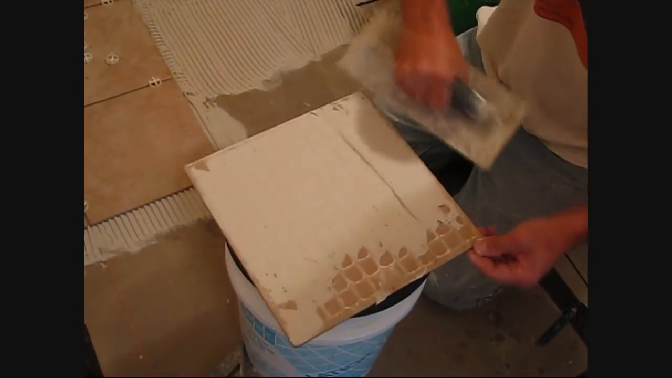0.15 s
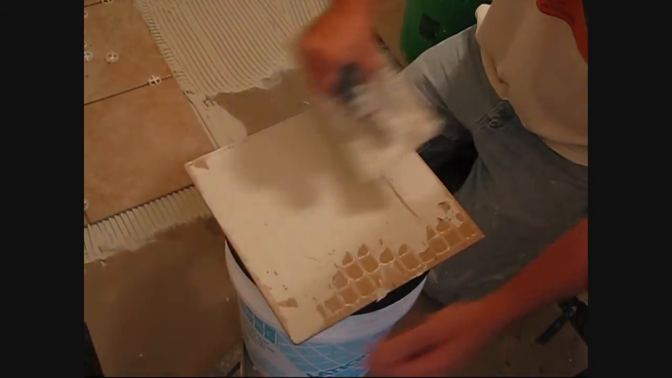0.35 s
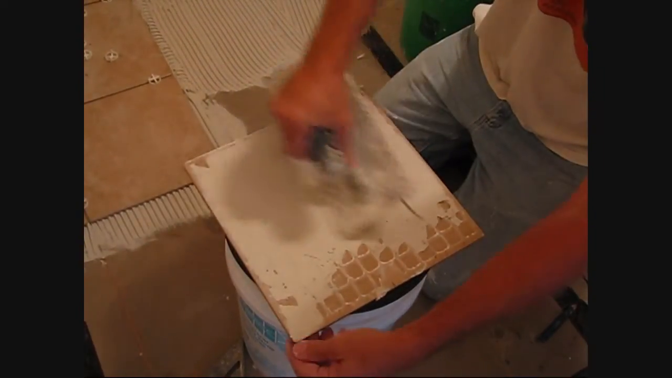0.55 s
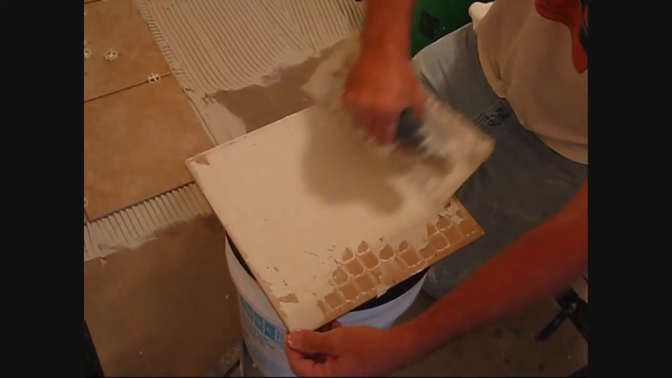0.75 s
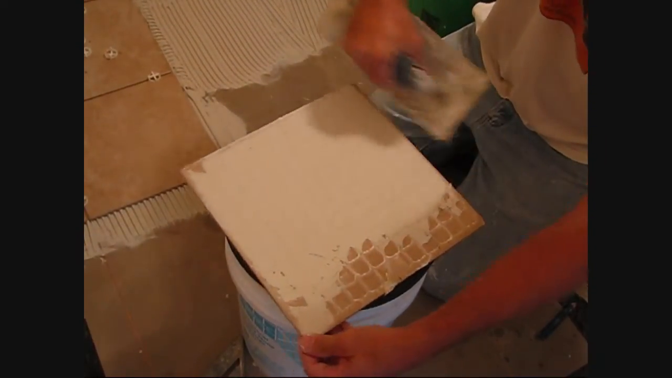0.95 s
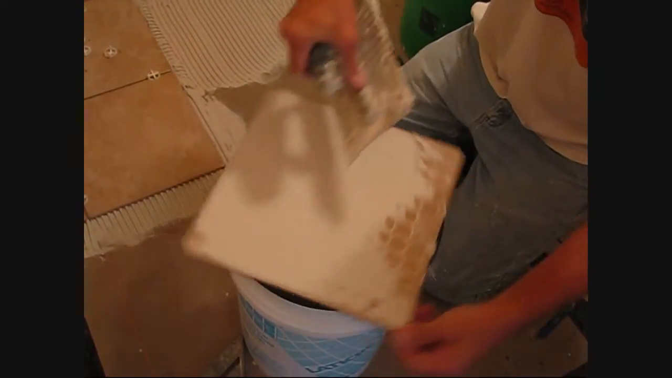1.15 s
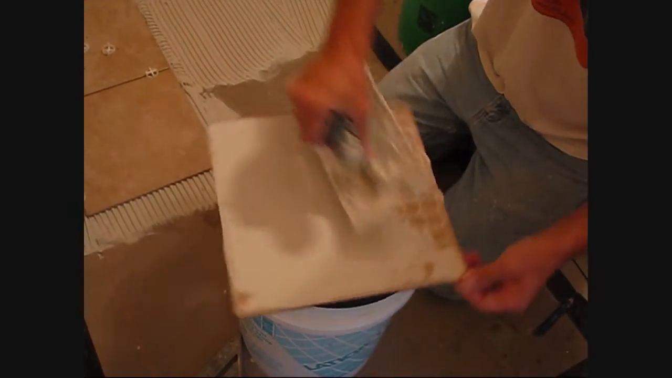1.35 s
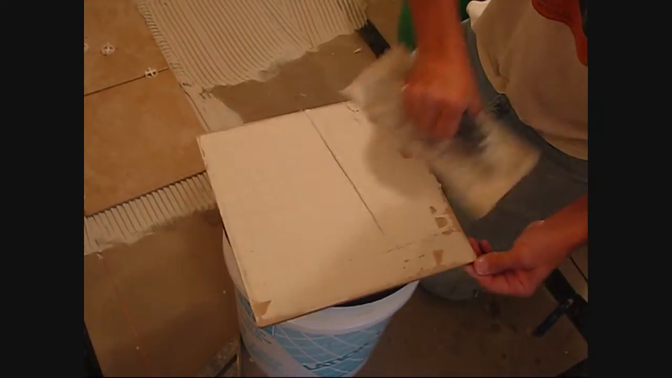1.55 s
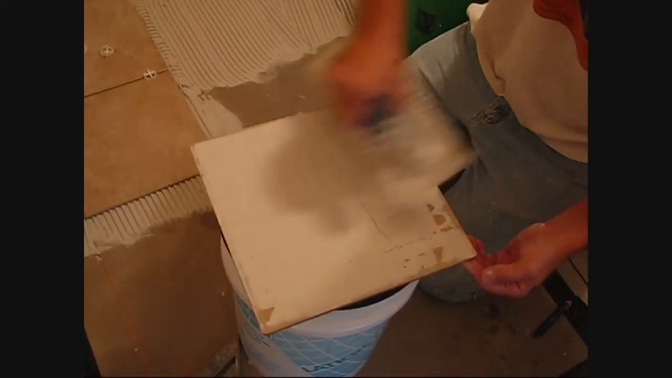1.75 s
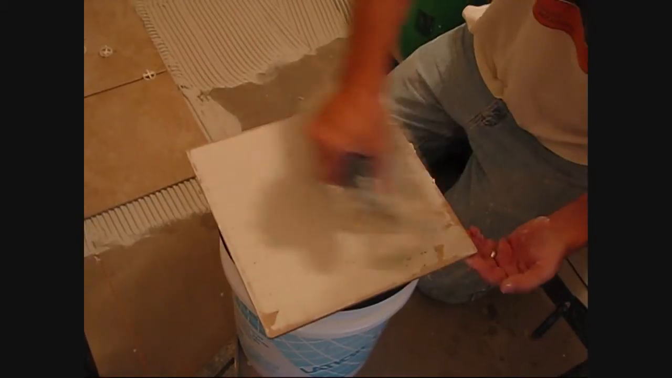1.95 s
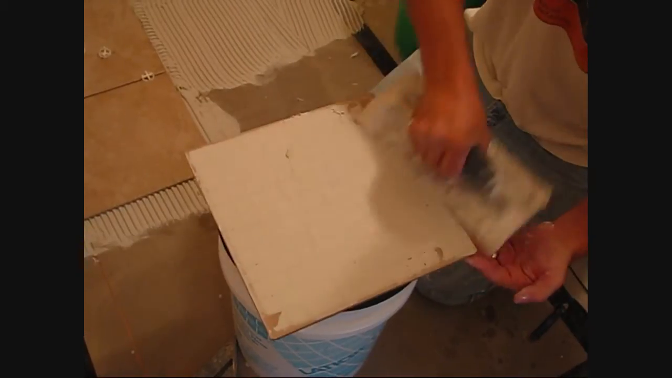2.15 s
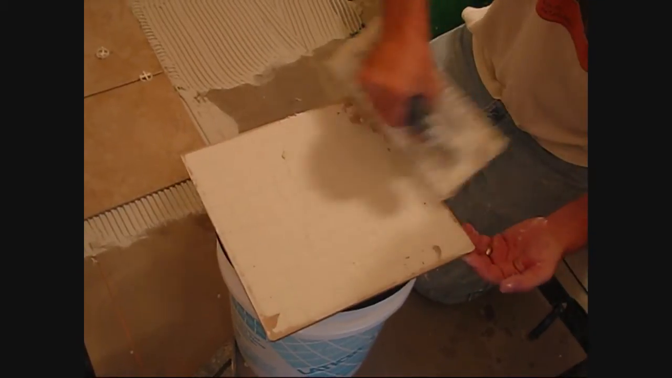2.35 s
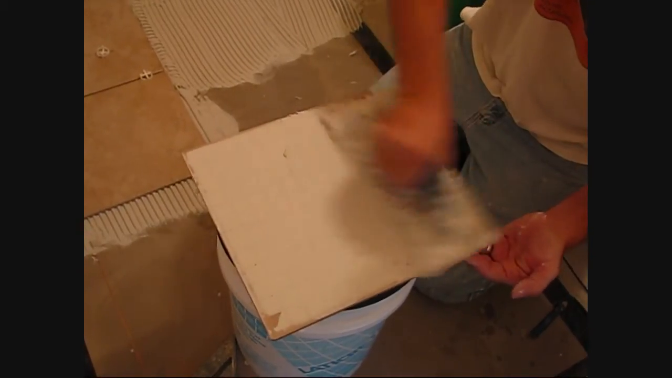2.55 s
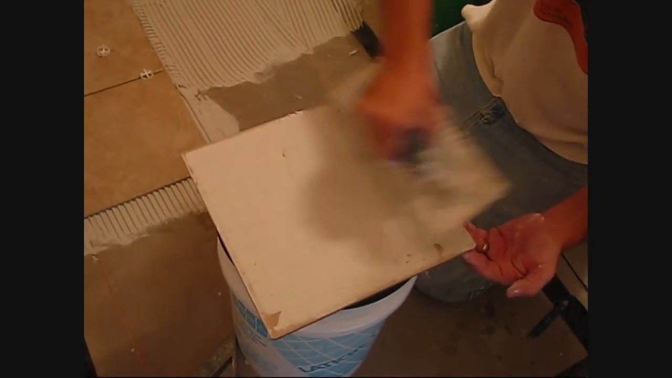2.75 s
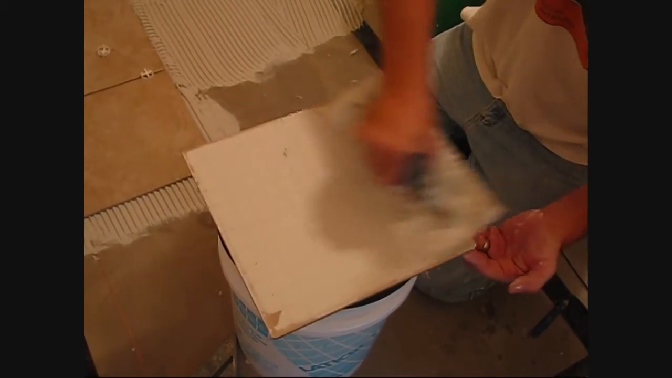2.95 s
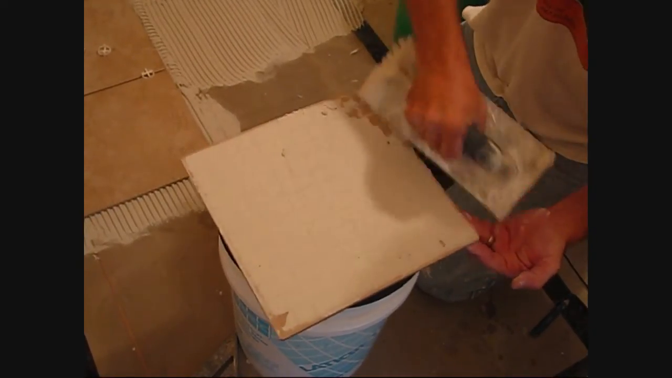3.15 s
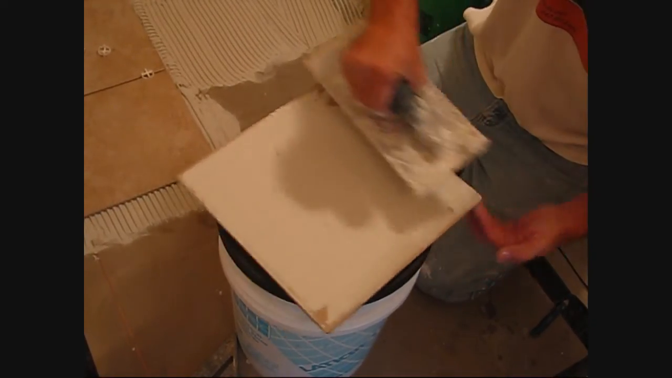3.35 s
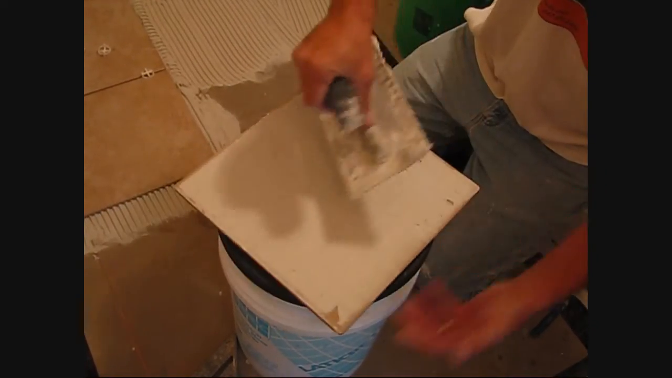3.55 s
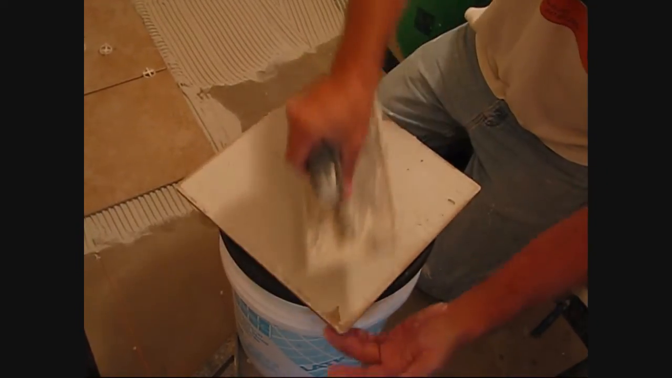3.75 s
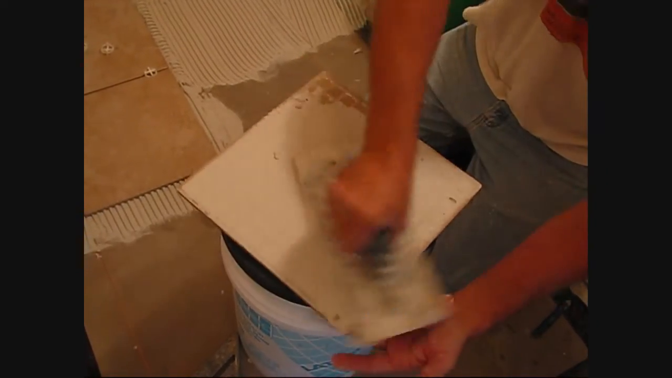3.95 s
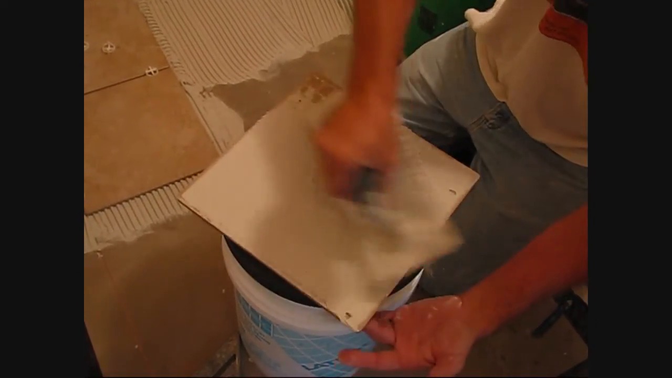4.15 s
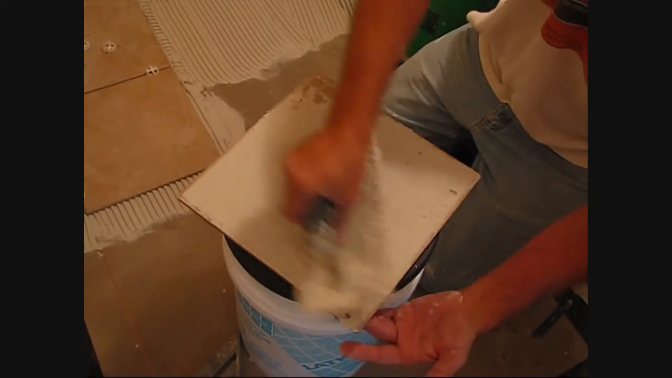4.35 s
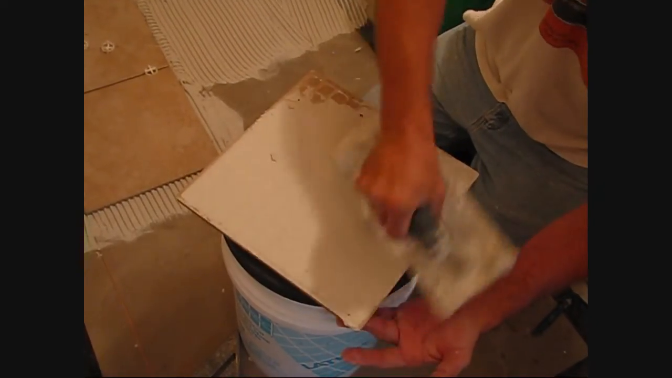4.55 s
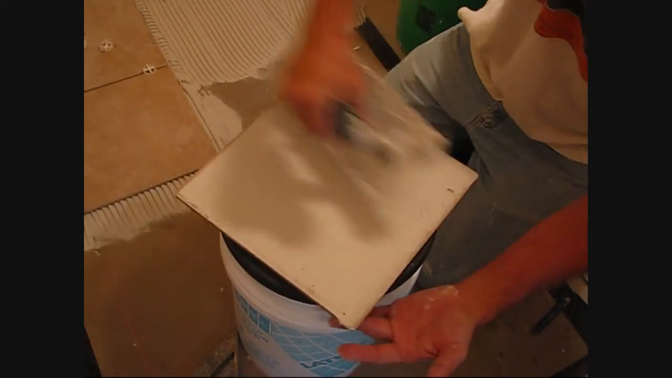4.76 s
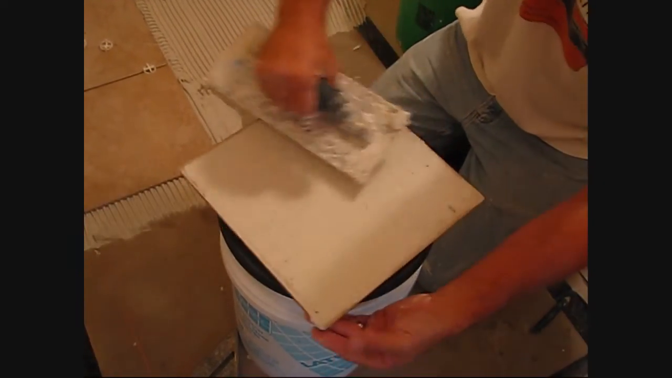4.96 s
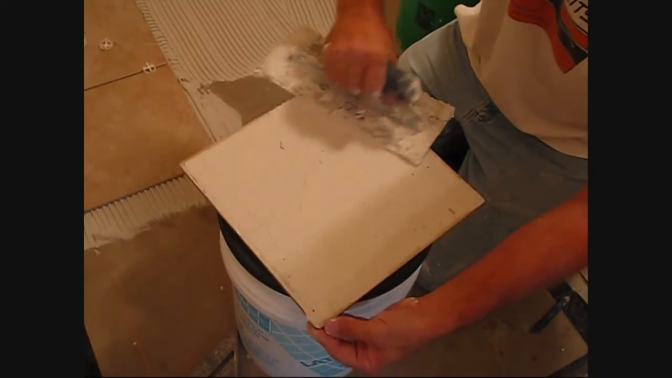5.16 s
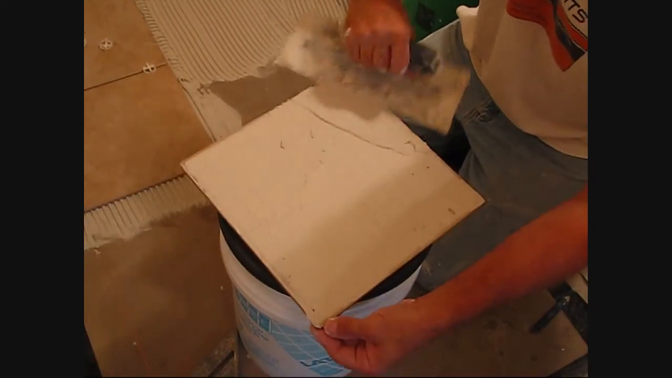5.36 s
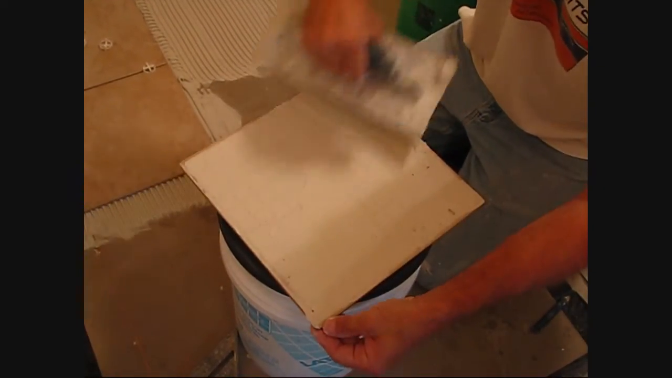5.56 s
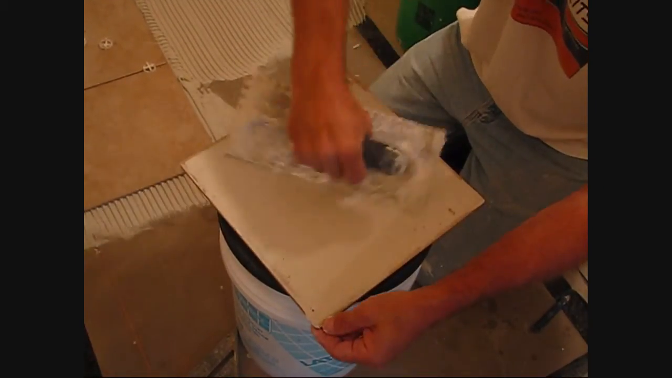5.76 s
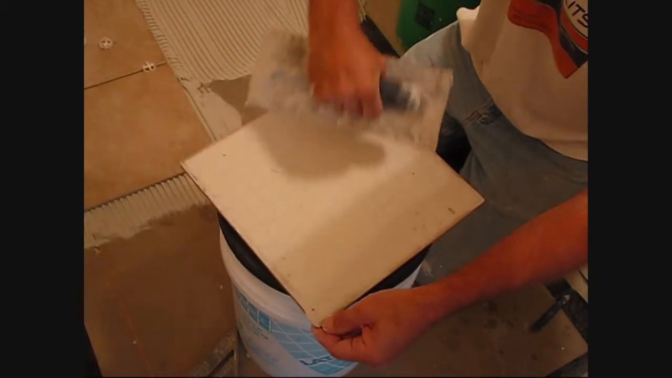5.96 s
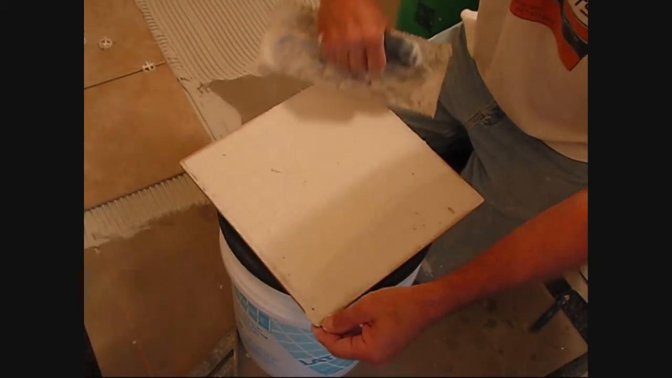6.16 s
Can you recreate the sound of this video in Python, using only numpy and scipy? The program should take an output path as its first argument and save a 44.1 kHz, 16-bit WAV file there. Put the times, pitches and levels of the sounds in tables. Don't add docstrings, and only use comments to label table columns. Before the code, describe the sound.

A steel trowel scrapes gritty mortar over a tile in ringing, sandy strokes, with dull bucket thumps, close up in a bare echoing room.

```python
import sys
import numpy as np
from scipy import signal
from scipy.fft import rfft, irfft, next_fast_len
from scipy.io import wavfile
from scipy.ndimage import uniform_filter1d

SR = 44100
rng = np.random.default_rng(int(sys.argv[2]) if len(sys.argv) > 2 else 0)


def to_wav(s):
    ch = np.atleast_2d(s).T
    pcm = np.round(np.clip(ch, -1, 1) * 32767)
    wavfile.write(sys.argv[1], SR, pcm.astype(np.int16))


def gain_from_db(level_db):
    decades = np.asarray(level_db, float) / 20
    return 10 ** decades


N = 277375
T = np.arange(N) / SR


def level(x, db):
    return x * gain_from_db(db) / np.sqrt(np.mean(x ** 2))


def on_log(hz, table):
    f, v = np.transpose(table)
    return np.interp(np.log(np.maximum(hz, 1)), np.log(f), v)


def colour(x, table):
    size = next_fast_len(len(x))
    hz = np.arange(size // 2 + 1) * SR / size
    return irfft(rfft(x, size) * gain_from_db(on_log(hz, table)), size)[:len(x)]


def mode(x, hz, t60):
    r = np.exp(-np.log(1000) / (max(t60, 1e-3) * SR))
    return (1 - r) * signal.lfilter([1, 0, -1], [1, -2 * r * np.cos(2 * np.pi * hz / SR), r * r], x)


def walk(rate):
    k = int(SR / rate)
    return 0.84 * uniform_filter1d(np.repeat(rng.standard_normal(N // k + 1), k), k)[:N]


def swell(start, length):
    return np.sin(np.pi * np.clip((T - start) / length, 0, 1))


def gate(start, length, bite_s, lift_s):
    closing = np.clip((T - start) / bite_s, 0, 1)
    return closing * np.clip(1 - (T - start - length) / lift_s, 0, 1)


def grit(per_s, spread_db):
    crack = rng.random(N) < per_s / SR
    return level(crack * rng.standard_normal(N) * gain_from_db(spread_db * rng.exponential(size=N)), 0)


def camera_hiss():
    # (frequency [Hz], level [dB per Hz])
    hush = [(12, -22), (20, 8.5), (154, -9.5), (204, -15), (367, -17), (499, -22.5), (1260, -21.5),
            (5680, -31), (7950, -31), (16000, -41.5)]
    return colour(rng.standard_normal(N), hush)


def camera_whine():
    return gain_from_db(-80.5 + 1.5 * walk(20)) * np.sin(2 * np.pi * 7870 * T)


def echoes(count):
    # (frequency [Hz], t60 [s])
    room = [(60, 0.48), (250, .55), (800, 0.69), (2000, 0.66), (4500, 0.56), (9000, 0.5), (14000, 0.38)]
    # (frequency [Hz], level [dB])
    room_send = [(40, -18), (150, -3.5), (400, 2), (16000, -3)]
    t, out = T[:SR], 0
    noise = rng.standard_normal((count, SR))
    for hz in 64 * 2 ** np.arange(0, 8.1, .5):
        band_pass = signal.butter(2, [hz / 1.181, hz * 1.098], "band", fs=SR, output="sos")
        band = signal.sosfilt(band_pass, noise)
        out = out + band * gain_from_db(on_log(hz, room_send) - 60 * t / on_log(hz, room))
    return out * np.clip((t - .004) / .012, 0, 1)


def rocking():
    # (time [s], length [s], level [dB])
    rocks = [(0.0, 0.42, -54.5), (.68, .14, -51.5), (.85, 0.6, -58), (1.2, 0.27, -57.5), (1.52, 0.25, -49),
             (2.0, .3, -61), (2.26, .2, -54), (2.68, 0.21, -47), (2.92, 0.1, -48.5), (3.03, .25, -54),
             (3.3, 0.39, -59), (4.35, .4, -59), (5.25, 0.41, -69), (5.9, 0.65, -48)]
    # (time of the peak [s], level [dB])
    shudders = [(.05, -30), (.37, -50), (.63, -43), (1.53, -40), (1.94, -33), (2.42, -54), (2.65, -35.5),
                (2.985, -36), (3.22, -47), (3.43, -34), (3.99, -37.5), (4.12, -46), (4.25, -51),
                (4.41, -46), (4.82, -52), (5.02, -58), (5.2, -58), (5.87, -44.5)]
    rise_db_s, fall_db_s = 400.5, 159.5
    hum, rumble = gain_from_db(-74.5), gain_from_db(-70.5)
    for s, length, db in rocks:
        hum = hum + gain_from_db(db) * swell(s, length)
    for s, db in shudders:
        rumble = rumble + gain_from_db(db + np.minimum(rise_db_s * (T - s), fall_db_s * (s - T)))
    wall = mode(rng.standard_normal(N), 140, 0.22) + gain_from_db(-9.5) * mode(rng.standard_normal(N), 250, 0.026)
    floor = mode(rng.standard_normal(N), 60, 0.095) + gain_from_db(1.0) * mode(rng.standard_normal(N), 30, 0.041)
    return hum * level(wall * gain_from_db(2.0 * walk(24)), -0.91) + rumble * level(floor, -5.5)


def turning():
    # (time [s], length [s], level [dB], fade [dB per s])
    turns = [
        (1.003, 0.55, -47.5, 35),
        (3.5, 0.16, -57.5, 190.5),
        (3.853, .11, -83.5, -39),
        (5.15, 0.24, -79, -55),
    ]
    # (frequency [Hz], level [dB per Hz])
    rub_tone = [(100, -25.5), (160, -1.5), (300, -6), (1000, 4), (3000, -11.5), (8000, -15), (16000, -27.5)]
    gain = 0
    for s, length, db, fade in turns:
        contact = gate(s, length, bite_s=0.023, lift_s=0.018)
        gain = gain + contact * gain_from_db(db - fade * np.clip(T - s, 0, length))
    rub = level(colour(grit(per_s=3400, spread_db=2.5), rub_tone), 0)
    return gain * gain_from_db(3.0 + 2.5 * walk(30)) * rub


def thumps():
    # (time [s], 60 Hz drum [dB], 140 Hz wall re drum [dB], rim re drum [dB])
    landings = [(0.03, -23.5, -2, -4), (0.039, -42, 23, -2), (0.198, -59, 25, 4), (0.607, -32.5, -6, -8),
                (0.879, -48.5, 3, 5.5), (1.472, -35.5, -8, -9), (1.488, -33, -15, -17),
                (1.901, -39.5, -5.5, -1), (2.249, -53, 6.5, 12), (2.601, -37.5, 6.5, 4),
                (2.937, -35, -18, -2.5), (3.197, -43.5, -7.5, 5.5), (3.389, -35, 7, 0),
                (3.972, -21.5, -11, -12), (3.989, -41, 15.5, -2.5), (4.098, -54, -12, -9),
                (4.349, -49, 4.5, -12), (4.795, -39, -11, -26), (5.167, -45, -19.5, -14),
                (5.325, -62, 8, -1), (5.832, -47, 3, 5.5), (5.857, -36.5, 0, -5), (6.097, -62, 15, 27.5)]
    # (frequency [Hz], t60 [s])
    bucket = [(62, 0.18), (138, 0.092), (255, 0.032), (370, 0.06)]
    s, drum_db, wall_db, rim_db = np.transpose(landings)
    mode_db = (drum_db, drum_db + wall_db, drum_db + rim_db, drum_db + rim_db - 0.5)
    out = 0
    rattle = rng.standard_normal(N)
    for (hz, t60), db in zip(bucket, mode_db):
        blow = np.zeros(N)
        blow[(s * SR).astype(int)] = gain_from_db(db)
        shake = signal.lfilter([1], [1, -np.exp(-1 / (0.019 * SR))], blow)
        cycles = np.arange(int(2 * SR / hz)) * hz / SR
        cushion = np.sin(np.pi * cycles / 2) * np.cos(2 * np.pi * cycles) * 1.5 * hz / SR
        push = signal.fftconvolve(blow, cushion)[:N] + .04 * shake * rattle
        out = out + 0.42 * t60 * SR / np.log(1000) * mode(push, hz, t60)
    return out


def catches():
    # (time [s], length [s], frequency [Hz], t60 [s], level [dB])
    snags = [(0.125, 0.064, 2400, .05, -38.5), (0.15, 0.078, 630, 0.41, -43), (2.95, .06, 2800, .01, -23.5),
             (5.38, 0.085, 295, 0.027, -52.5), (2.62, .08, 1500, .01, -34),
             (4.58, 0.096, 1170, 0.0057, -32), (1.5, 0.21, 270, 0.03, -60), (1.56, 0.05, 800, 0.07, -31),
             (2.68, 0.085, 520, .3, -47), (2.3, .07, 1700, .05, -36.5), (2.76, 0.16, 225, 0.06, -53),
             (1.94, 0.13, 2400, 0.0042, -24), (5.33, 0.112, 132, .06, -57), (5.835, 0.18, 2300, .005, -25),
             (5.372, 0.035, 2700, 0.025, -31), (4.6, 0.096, 571, 0.24, -47), (2.94, 0.073, 720, 0.12, -33),
             (5.47, 0.11, 545, 0.25, -45), (6.05, 0.25, 180, 0.17, -51.5)]
    out = 0
    for s, length, hz, t60, db in snags:
        rub = rng.standard_normal(N) * swell(s, length)
        out = out + gain_from_db(db) * np.sqrt(t60 * SR / 4) * mode(rub, hz, t60)
    return out


def strokes():
    # (time [s], rise [s], hold [s], tile ring [dB], sand hiss re ring [dB]); a faint sound opens,
    # then the blade lands or bites in
    taps = [(.003, .004, .01, -56, -7), (0.019, 0.011, .06, -32.5, -10), (0.593, 0.0094, .04, -20, 0.5),
            (1.464, .006, .08, -42, -11), (1.905, 0.0066, .04, -22.5, -2), (2.598, 0.013, .04, -34, 0.5),
            (2.915, 0.0079, .03, -36.5, 6), (3.393, .006, .045, -38.5, -6.5), (3.971, .006, .06, -30.5, -9),
            (4.341, .004, .04, -38, 7), (5.148, .005, .05, -59.5, -14), (5.324, .008, .04, -58, 0),
            (5.371, 0.032, .04, -36, 4.5), (5.828, 0.018, .03, -17, -5)]
    swipes = [
        (.095, 0.029, 0.062, -27.5, 9),
        (1.556, 0.034, .045, -27, 11.3),
        (2.619, .055, 0.06, -31, 5.6),
        (4.02, 0.047, 0.046, -29.5, 10.8),
        (5.399, 0.054, 0.033, -32, 8.7),
    ]
    flicks = [
        (.83, .05, 0.04, -27, 5.5),
        (2.199, 0.055, 0.031, -27.5, 6.2),
        (3.11, 0.059, 0.032, -30, 6.4),
        (4.45, 0.053, 0.083, -29.5, 8.9),
        (6.1, 0.14, .07, -30, 12.1),
    ]
    drags = [
        (.61, 0.038, 0.3, -23, -3),
        (1.914, 0.061, 0.23, -24, -2),
        (2.926, 0.026, 0.24, -24.5, 0.5),
        (4.372, 0.056, .18, -24, 0.5),
        (5.841, 0.077, 0.45, -24, -1),
        (1.1, .1, .25, -66.5, 5),
        (5.15, .03, .19, -78, 7.5),
    ]
    digs = [(.645, 0.0086, 0.022, -23, -3), (.685, .01, .02, -32.5, 7), (.735, 0.0088, 0.015, -27, 3),
            (1.945, 0.022, 0.043, -22.5, -7), (2.04, 0.009, 0.016, -30.5, -8),
            (2.955, 0.021, 0.031, -20, -2), (4.38, 0.0091, 0.013, -27.5, -5), (4.415, .012, .03, -26, 5),
            (5.91, .012, 0.09, -26, -7), (.125, .008, 0.018, -33, 9.5), (.15, .008, 0.017, -36, 8),
            (1.485, .01, 0.061, -50, -5), (1.546, .008, .015, -41, -4), (1.99, .01, 0.022, -25.5, -8),
            (2.25, 0.0091, 0.016, -26.5, -6), (2.64, 0.0085, .02, -36, 3), (5.44, 0.0066, .02, -35.5, 9.5),
            (5.837, .005, 0.065, -20, -10), (6.03, .02, 0.06, -32.5, 1)]
    motion = {"tap": (.002, 10, .025, .02), "swipe": (0.017, 12.3, 0.091, .05),
              "flick": (0.025, 12, .08, .04), "drag": (.004, 9, 0.13, 0.039),
              "dig": (.004, 4.8, 0.024, .02)}
    voice = {"tap": (13, 16, -11.5, 3), "swipe": (13, 19, -10, 5.5), "flick": (7.5, 16, -13, 4.5),
             "drag": (11, 6, -14, 6), "dig": (8, 9, -11, 5.5)}
    edge_per_hiss = .15
    power = np.zeros((4, N))
    for kind, rows in (("tap", taps), ("swipe", swipes), ("flick", flicks), ("drag", drags), ("dig", digs)):
        bite, under_db, settle, lift = motion[kind]
        sag_db, hiss_sag_db, body_db, edge_db = voice[kind]
        for s, rise, hold, db, hiss_db in rows:
            on = slice(int(s * SR), int((s + rise + hold + lift) * SR))
            t = T[on] - s
            eased = 1 - np.exp(-np.maximum(t - rise, 0) / settle)
            climb = gain_from_db(db - under_db * np.clip(1 - t / rise, 0, 1))
            press = gate(s, rise + hold, bite, lift)[on] * climb
            ring = press * gain_from_db(-sag_db * eased)
            hiss = press * gain_from_db(hiss_db - hiss_sag_db * eased)
            edge = ring * gain_from_db(edge_db + edge_per_hiss * hiss_db)
            power[:, on] += np.array([ring, hiss, ring * gain_from_db(body_db), edge]) ** 2
    return np.sqrt(power)


def ring_modes(modes, whole, edge, wander_db, wander_rate):
    out = 0
    for k, (hz, t60, db) in enumerate(modes):
        drive = edge if hz > 1200 else whole
        out = out + (-1) ** k * gain_from_db(db) * mode(drive * gain_from_db(wander_db * walk(wander_rate)), hz, t60)
    return out


def scrape():
    # (frequency [Hz], width [Hz], level [dB])
    tile = [(669, 228, -1), (936, 177, 8), (1293, 362, 2.5), (1753, 314, 5.5), (2270, 444, 1),
            (2653, 465, 0.5), (3760, 1400, -11)]
    # (frequency [Hz], t60 [s], level [dB])
    blade = [(623, 0.67, -1.5), (880, 0.065, 3), (1034, 0.36, 1), (1313, 0.2, 0.5), (1490, 0.11, -16),
             (1690, 0.078, -13.5), (1767, 0.14, 8.5), (1970, 0.38, 1.5), (2620, 0.3, -8.5),
             (4710, 0.029, -1.5), (5200, 0.037, -9.5), (7020, 0.019, -11.5)]
    # (frequency [Hz], level [dB per Hz])
    sand_tone = [(1470, -28), (2500, -1.5), (3580, -5.5), (5250, -4.5), (6300, -7), (13400, -10),
                 (15900, -14), (16300, -58), (16800, -97)]
    ring, hiss, body, edge = strokes()
    chatter = gain_from_db(2.0 * walk(80) + 1.2 * walk(24.99))
    push = level(grit(per_s=5000, spread_db=1.5) * chatter, 0)
    tile_modes = [(hz, 2.03 / width, db) for hz, width, db in tile]
    broad = ring_modes(tile_modes, push * ring, push * edge, wander_db=1.38, wander_rate=14)
    steel = ring_modes(blade, push * ring, push * edge, wander_db=3.2, wander_rate=9)
    sand = hiss * level(colour(grit(per_s=20000, spread_db=2.21) * chatter ** 0.64, sand_tone), 0)
    low_body = mode(push * body, 450, 0.0061)
    return gain_from_db(9.5) * broad + gain_from_db(7.5) * steel + sand + gain_from_db(13.5) * low_body


def scene():
    # (frequency [Hz], side minus mid [dB])
    port_width = [(60, -36), (110, -33.5), (200, -39.5), (380, -13), (700, -14.5), (1290, -11),
                  (2380, -5.5), (4400, -3.5), (8120, -2), (15000, -2)]
    near = gain_from_db(-.5) * (scrape() + thumps() + turning() + catches())
    place = 2.54 * walk(5)
    sent = near * np.array([np.cos(place), np.sin(place)])
    tails = echoes(count=4)
    tails[2:] += gain_from_db(13.0) * rng.standard_normal((2, SR)) * np.exp(-T[:SR] / 0.0018)
    mid_echo = signal.fftconvolve(sent, tails[:2], axes=1).sum(0)[:N]
    side_echo = signal.fftconvolve(sent, tails[2:], axes=1).sum(0)[:N]
    mid = near + rocking() + gain_from_db(-31) * mid_echo
    side = gain_from_db(-28) * colour(side_echo, port_width)
    hush_db = -62.5
    mid += level(camera_hiss(), hush_db) * gain_from_db(1.5 * walk(6))
    mid += camera_whine()
    side += level(colour(camera_hiss(), port_width), hush_db - 11.0)
    side -= .04 * mid
    return np.array([mid + side, mid - side])


def low_pass(x):
    return signal.sosfilt(signal.butter(12, 16960, fs=SR, output="sos"), x)


def record(dry):
    soft = np.tanh(0.95 * dry) / 0.83
    top_cut = signal.ellip(8, .2, 70, 16100, fs=SR, output="sos")
    return low_pass(signal.sosfilt(top_cut, soft))


dry = scene()
out = record(dry)
to_wav(out)
```